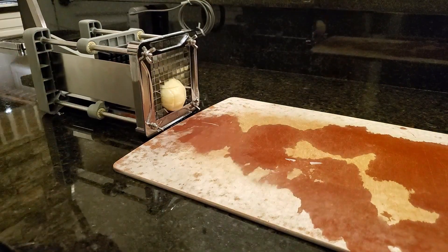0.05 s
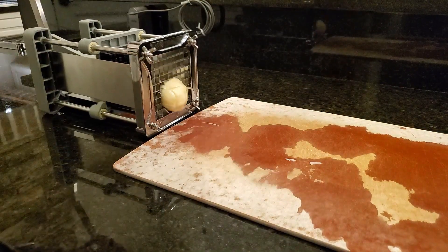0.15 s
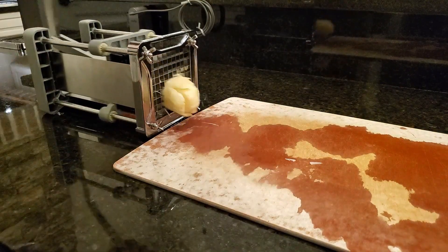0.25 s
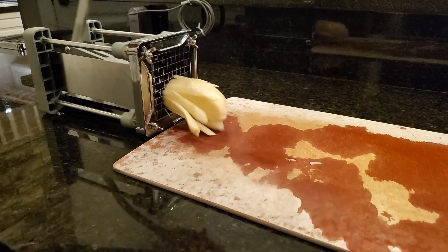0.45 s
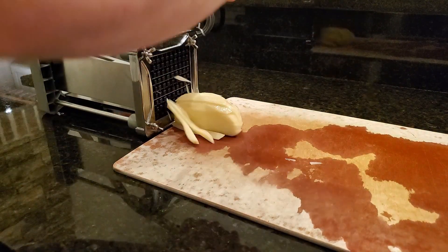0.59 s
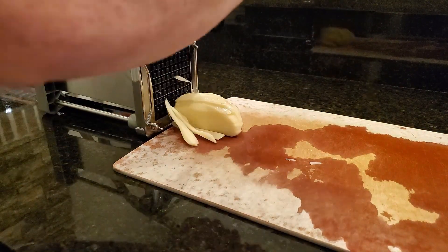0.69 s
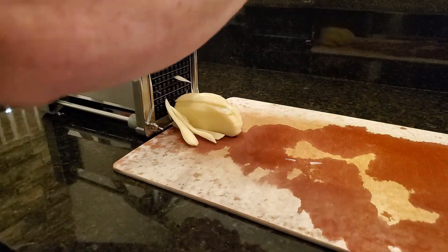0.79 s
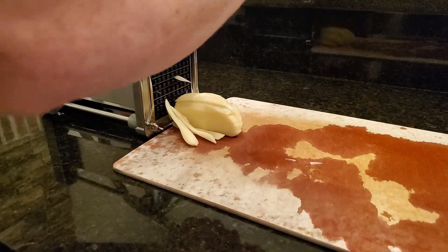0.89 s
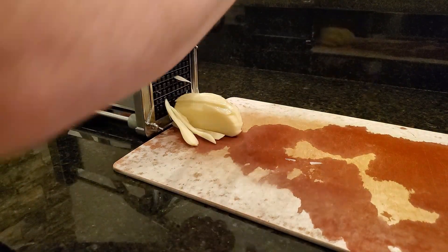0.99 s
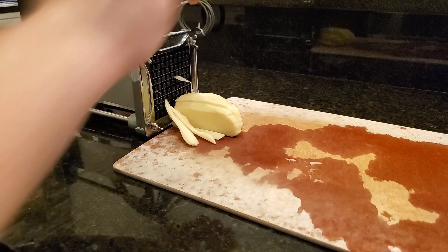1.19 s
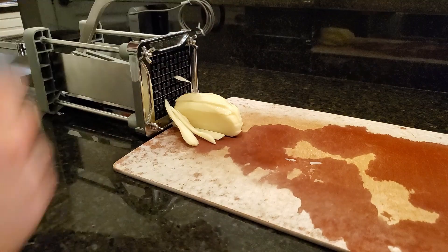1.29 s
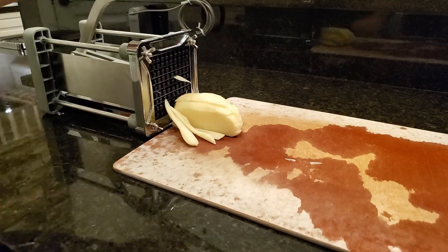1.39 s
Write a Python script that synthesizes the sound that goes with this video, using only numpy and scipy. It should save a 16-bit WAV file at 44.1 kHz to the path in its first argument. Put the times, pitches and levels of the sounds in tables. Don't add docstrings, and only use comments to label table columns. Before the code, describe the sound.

Loud crackling tear of raw potato through metal blades, with brief steel ring and low boom, then a short clattering slap of pieces on a board, fading into quiet kitchen hum; close microphone, left-weighted.

```python
import sys
import numpy as np
from scipy import signal
from scipy.fft import rfft, irfft
from scipy.io import wavfile
from scipy.ndimage import uniform_filter1d

SR = 44100
rng = np.random.default_rng(int(sys.argv[2]) if len(sys.argv) > 2 else 0)


def pcm_store(signal):
    levels = np.round(np.clip(np.atleast_2d(signal), -1, 1) * 32767)
    wavfile.write(sys.argv[1], SR, levels.astype(np.int16).T)


def nominal_scale(level):
    x = np.asarray(level, float) / 20
    return 10 ** x


N = 63945
T = np.arange(N) / SR


def noise():
    return rng.standard_normal(N)


def unit(x):
    return x / np.sqrt(np.mean(x ** 2))


def butter(x, hz, kind):
    return signal.sosfilt(signal.butter(2, hz, kind, fs=SR, output="sos"), x)


def waver(size):
    return unit(uniform_filter1d(uniform_filter1d(noise(), size=size), size=size))


def colour(x, points, power=1):
    size = 4096
    hz, db = np.array(points, float).T
    bins_hz = np.arange(size // 2 + 1) * SR / size
    log_gain = power * np.interp(np.log(bins_hz + 1), np.log(hz), db) * np.log(10) / 20
    cepstrum = irfft(log_gain)
    cepstrum[1:size // 2] *= 2
    cepstrum[size // 2 + 1:] = 0
    return signal.fftconvolve(x, irfft(np.exp(rfft(cepstrum))))[:N]


def ring(x, hz, t60):
    pole = np.exp(2j * np.pi * hz / SR - np.log(1000) / (max(t60, 1e-3) * SR))
    return signal.lfilter([1], [1, -pole], x).imag


def tick(at_s, db, push_s):
    shape = np.exp(-.5 * ((T - at_s) / push_s) ** 2)
    return nominal_scale(db) * shape / shape.sum()


def burst(at_s, spread_s):
    return (T > at_s) * np.exp(-np.abs(T - at_s) / max(spread_s, 5e-4))


def curve(points, axis):
    rows = np.array(points)
    return np.interp(T, rows[:, 0], rows[:, axis])


def gated(points):
    return (T > points[0][0]) * (T < points[-1][0]) * nominal_scale(curve(points, axis=1))


def wide(points):
    mid, side = colour(noise(), points), colour(noise(), points)
    side = colour(side, [(60, -18.5), (300, -3.0), (1000, -1.5)])
    return (mid + side * np.array([[1], [-1]])) / np.sqrt(np.mean(mid ** 2))


def tearing():
    # t/s, tearing level/dB, brightness/dB
    push = [
        (.227, -48, -24),
        (.233, -29.5, -11.5),
        (.236, -20.5, 1),
        (.32, -24, 5),
        (.35, -23.5, -1.5),
        (.41, -31.5, 2),
        (.435, -37.5, -7.5),
        (.54, -41, -6.5),
        (.55, -50.5, -9),
        (.592, -58.5, -18),
    ]
    # t/s, peak/dB, length/s
    jerks = [(0.228, -19, 0.0045), (0.2368, -5.5, 0.0063), (0.255, -6, 0.0076), (0.261, -11, 0.0053),
             (0.271, -8, 0.0038), (0.279, -10, 0.0086), (0.2924, -3.5, 0.0022), (0.2965, -8, 0.0023),
             (0.304, -9, 0.0047), (0.3077, -11, 0.0018), (0.3151, -6, 0.0036), (0.323, -18, 0.0031),
             (.393, -20, 0.003), (0.401, -26, 0.0027), (0.406, -26, 0.0036)]
    # f/Hz, density/dB per Hz
    flesh_colour = [(150, -7), (300, -9.5), (580, -11.5), (1600, -4.5), (3300, -6), (4200, -1.5),
                    (7500, -12.5), (16000, -4)]
    # t/s, level/dB
    strain_level = [(.172, -82), (.178, -63.5), (.2, -64), (.226, -59.5)]
    # f/Hz, density/dB per Hz
    strain_colour = [(700, -14.5), (1100, -0.5), (2000, -2), (4000, -6.5), (7500, -26.5), (14000, -15.5)]
    grains_per_s, spread_db = 20000, 1.2
    chance, size = rng.random((N, 2)).T
    full_or_half = np.where(chance < grains_per_s / SR, 1, .5)
    grains = full_or_half * nominal_scale(-spread_db * np.log(size + 1e-9)) * noise()

    level = gated(push)
    for at_s, db, length_s in jerks:
        rise = 1 - burst(at_s, length_s / 6)
        level = level + nominal_scale(db - 7.0) * rise * burst(at_s, length_s)
    flesh = unit(colour(grains, flesh_colour))
    treble = butter(flesh, 7500, "high")
    bright = flesh + (nominal_scale(curve(push, axis=2)) - 1) * treble
    strain = unit(colour(grains, strain_colour)) * gated(strain_level)
    return level * bright + strain, frame(grains * level)


def frame(shake):
    # f/Hz, level/dB, t60/s
    modes = [(1392.3, -14, 0.72), (1551, -14, 0.35), (1590.6, -2, .33), (2230, -5.5, 0.03),
             (2481.5, -6, 0.11), (3050, -16.5, 0.12), (3873, -6.5, 0.14), (4028, -7.5, 0.12),
             (4364, -6.5, 0.09), (4440, -7.5, 0.071), (5600, -9, 0.1), (6523, -8.5, 0.059),
             (13740, -11.5, .08), (15580, -5.5, 0.1182)]
    # t/s, strength/dB, centre of the blow f/Hz
    knocks = [(0.234, -28.5, 4000), (0.2577, -20, 4200), (0.262, -20.5, 1600), (.283, -25.5, 1450),
              (0.2928, -15.5, 4250), (.304, -19.5, 4400), (.296, -17.5, 1612), (0.314, -22, 4400),
              (0.318, -25, 1450), (.38, -27, 2500), (.39, -24.5, 2230), (.396, -23.5, 2460),
              (0.403, -28.5, 5600), (0.735, -49, 1245), (0.944, -53, 1230)]
    # t/s, level/dB
    grip = [(.8, 0), (.9, -18)]
    shake_db, blow_octaves, waver_db = -46.5, 0.41, 1
    at_s, strength_db, aim_hz = np.array(knocks, float).T
    out = 0
    for k, (hz, db, t60) in enumerate(modes):
        octaves_off = np.log2(hz / aim_hz) / blow_octaves
        blows = np.bincount((at_s * SR).astype(int), nominal_scale(strength_db - 4.7 * octaves_off ** 2), N)
        gain = (-1) ** k * nominal_scale(db + waver_db * waver(400))
        out = out + gain * ring(blows + nominal_scale(shake_db) * shake, hz, t60)
    return out * nominal_scale(curve(grip, axis=1))


def linkage():
    # t/s, peak/dB, pitch f/Hz, t60/s
    clicks = [
        (0.017, -50.5, 1202, 0.0037),
        (0.175, -56.5, 1700, 0.033),
        (0.176, -66, 1100, 0.035),
        (0.1942, -52, 6680, 0.0088),
        (0.1952, -55, 5032, .006),
        (.211, -40, 12000, .001),
        (0.2182, -44, 6700, 0.0071),
        (.2190, -39, 3700, .006),
        (0.951, -60, 3505, 0.001),
        (1.012, -66, 6000, 0.0039),
    ]
    spit = noise()
    out = 0
    for at_s, db, hz, t60 in clicks:
        out = out + ring(nominal_scale(db - 12.5) * spit * burst(at_s, 0.0013), hz, t60)
        out = out + nominal_scale(db - 13.0) * spit * burst(at_s, .001)
    return out


def sticks():
    # t/s, peak/dB, spread/s
    drops = [
        (0.571, -38.5, 0.0053),
        (0.578, -42, 0.0036),
        (0.596, -21, 0.0019),
        (0.598, -20, 0.0036),
        (0.6063, -28.5, 0.0034),
        (0.611, -36, 0.025),
        (0.62, -43, .005),
        (0.6531, -41.5, 0.0056),
        (.684, -48, 0.01),
    ]
    # t/s, level/dB
    clacks = [
        (.5953, -25.5),
        (.5963, -28),
        (0.5969, -24),
        (.6, -32),
        (.6058, -34),
    ]
    # f/Hz, level/dB, t60/s
    modes = [(310, -15, 0.024), (729, -8, 0.027), (1054, -6.5, 0.013), (1261, -4.5, 0.03),
             (1691, -2, 0.026), (2050, -12, 0.025), (2458, -9, 0.033), (3336, -15.5, 0.021),
             (3660, -12.5, .025), (3840, -16, 0.097), (4410, -15, 0.024)]
    slaps = noise() * sum(nominal_scale(db) * burst(at_s, spread_s) for at_s, db, spread_s in drops)
    crack = colour(rng.choice([-1., 1.], N) * slaps,
                   [(250, -6), (600, -4.5), (1000, 5), (3800, -2), (4400, -7), (6500, -11), (7500, -22),
                    (14000, -12)])
    blow = nominal_scale(-21.5) * slaps - sum(tick(at_s, db, 3e-5) for at_s, db in clacks)
    board = sum((-1) ** k * nominal_scale(db) * ring(blow, hz, t60) for k, (hz, db, t60) in enumerate(modes))
    return board, nominal_scale(-1.5) * crack


def counter():
    # t/s, peak/dB, pitch f/Hz, t60/s
    booms = [(0.231, -31, 151, 0.11), (0.257, -29.5, 50, 0.2), (0.2701, -16, 60, 0.075),
             (0.271, -25.5, 107, 0.034), (0.289, -30.5, 105, .15), (.335, -27.5, 97.4, 0.45),
             (0.392, -25.5, 97.76, 0.37), (0.391, -25, 184, 0.043), (0.489, -45, 61.8, 0.47),
             (0.54, -37.5, 105, 0.16), (0.621, -38.5, 59.4, 0.18), (.63, -46.5, 261, 0.21),
             (.72, -53.5, 301, 0.14), (0.227, -35, 225, 0.13), (0.23, -29, 310, 0.13),
             (.262, -33, 306, .06), (.45, -46, 193, 0.18), (.51, -43, 190, 0.2), (0.661, -37, 137.7, .12),
             (0.689, -45, 193.3, 0.15), (.73, -37.5, 54.8, 0.12), (1.323, -47.5, 56.6, 0.091)]
    return sum(ring(tick(at_s, db, 0.044 / hz), hz, t60) for at_s, db, hz, t60 in booms)


def sleeve():
    # f/Hz, density/dB per Hz
    cloth = [(880, -48.5), (1500, -16.5), (2110, -13), (3280, -4), (6650, -2), (7700, -11), (14900, 0),
             (15600, -7.5)]
    peak_s, rise_s, fall_s = 1.379, .12, 0.1
    swell = np.exp(-((T - peak_s) / np.where(T < peak_s, rise_s, fall_s)) ** 2)
    rub = unit(colour(noise(), cloth)) * swell * nominal_scale(-58.5)
    return rub * nominal_scale(np.array([[0], [-49]]))


def room(x):
    # f/Hz, t60/s
    decay = [(100, 1), (1000, 0.55), (4000, 0.39), (16000, 0.14)]
    hz, t60 = np.array(decay, float).T
    tail = 0
    for low_hz in 60 * 2 ** np.arange(8):
        band = butter(noise(), [low_hz, low_hz * 2.0], "band")
        band_t60 = np.interp(np.log(low_hz * 1.4), np.log(hz), t60)
        tail = tail + band * nominal_scale(-60 * T / band_t60)
    tail = tail * np.clip(T / 0.0019, 0, 1)
    return signal.fftconvolve(x, tail / np.sqrt(np.sum(tail ** 2)))[:N]


def kitchen():
    # f/Hz, density/dB per Hz
    hum_colour = [(15, -38.5), (30, -15.5), (55, 3.5), (76, -5.5), (119, -12), (421, -32), (1000, -53),
                  (1300, -84.5), (2200, -120)]
    # f/Hz, density/dB per Hz
    hiss_colour = [(410, -44), (700, -18.5), (797, -0.5), (873, -8), (2050, -14), (5860, -17.5), (6420, -7),
                   (8760, -25.5), (15500, -5.5)]
    # t/s, level/dB
    creak_level = [(0, -57), (.03, -60), (.09, -73.5), (.17, -75)]
    # f/Hz, density/dB per Hz
    creak_colour = [(300, -14), (600, 1), (1500, -13.5), (3500, -13), (7500, -23), (11000, -22.5),
                    (13000, -10.5), (16000, -15.5)]
    hum = wide(hum_colour) * nominal_scale(-58 + 2.2 * waver(1500))
    hiss = wide(hiss_colour) * nominal_scale(-77.5 + np.array([[1], [-3]]))
    creak = wide(creak_colour) * nominal_scale(curve(creak_level, axis=1) + np.array([[2], [-6]])) * (T < .23)
    creak_low = unit(butter(noise(), [50, 170], "band")) * nominal_scale(-47.5 - 60 * T / .5)
    return hum + hiss + creak + creak_low


def scene():
    # f/Hz, left over right/dB
    left_over_right = [(60, -3.5), (200, -3), (380, -4.5), (700, 6.5), (1290, 10), (4400, 16), (8120, 15),
                       (15000, 23)]
    right_lag_s, boom_lag_s, scatter_s = .00015, 0.00051, 0.01
    board, crack = nominal_scale(3.5) * np.array(sticks())
    fall = board + crack
    fall_to_room = nominal_scale(-7.5) * board + nominal_scale(5.5) * crack
    flesh, steel = nominal_scale(3.5) * np.array(tearing())
    flesh = flesh + nominal_scale(4.5) * linkage()
    shaded = flesh + nominal_scale(-4) * steel

    left = flesh + steel + fall + nominal_scale(-15) * room(flesh + nominal_scale(-4.5) * steel + fall_to_room)

    scatter = noise() * np.exp(-T / scatter_s)
    scattered = signal.fftconvolve(shaded, scatter / np.sqrt(np.sum(scatter ** 2)))[:N]
    late = np.interp(T - right_lag_s, T, shaded) * nominal_scale(-8)
    late = late + nominal_scale(6.5) * colour(scattered, [(300, -12.5), (1500, -4.5)])
    right = colour(late, left_over_right, power=-0.84) * nominal_scale(-5.5)
    right = right + nominal_scale(-23.5) * room(shaded + nominal_scale(-1) * fall_to_room)
    late_fall = np.interp(T - right_lag_s, T, fall)
    right = right + nominal_scale(-10.5) * colour(late_fall, [(400, 10.0), (1500, 2.5), (8000, -4.5)])

    booms = counter()
    late_booms = np.interp(T - boom_lag_s, T, booms)
    return np.array([left + booms, right + late_booms]) + kitchen() + sleeve()


def roll_off(x):
    return signal.sosfilt(signal.butter(12, 16820, fs=SR, output="sos"), x)


def record(dry):
    rounded = np.tanh(1.037 * dry) / 1.132
    no_rumble = butter(rounded, 36, "high")
    top_cut = signal.ellip(6, .2, 40, 15750, fs=SR, output="sos")
    return roll_off(signal.sosfiltfilt(top_cut, no_rumble))


dry = scene()
out = record(dry)
pcm_store(out)
```